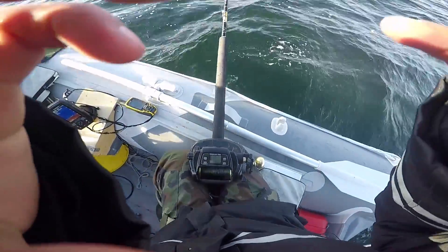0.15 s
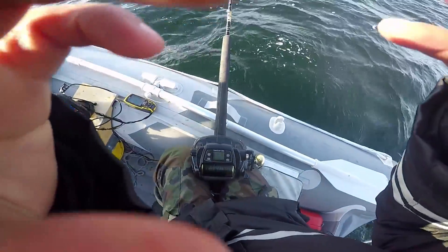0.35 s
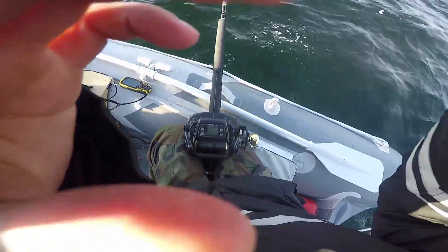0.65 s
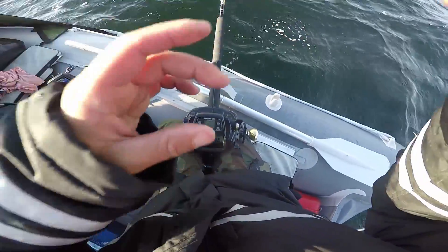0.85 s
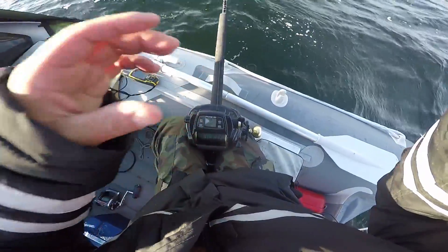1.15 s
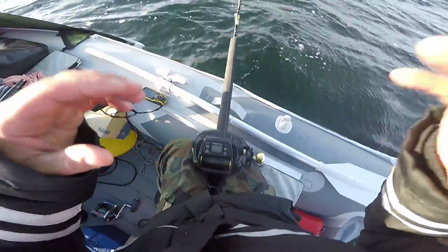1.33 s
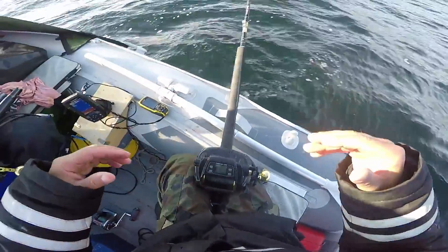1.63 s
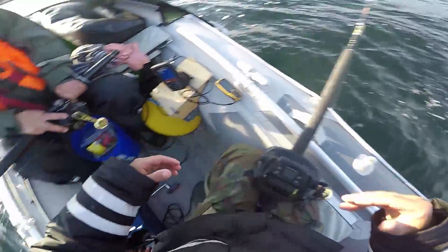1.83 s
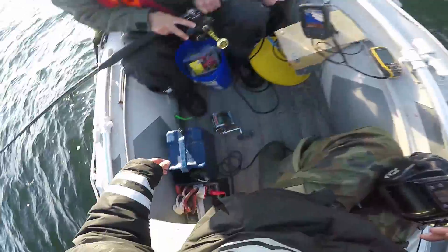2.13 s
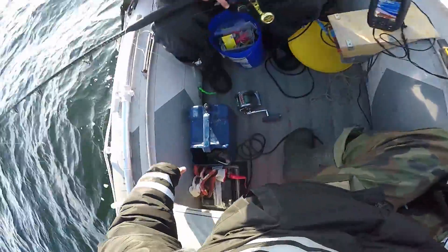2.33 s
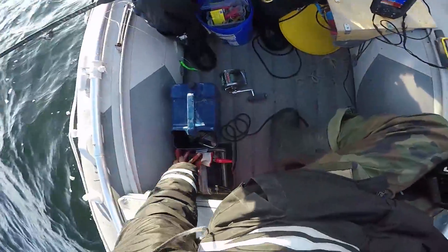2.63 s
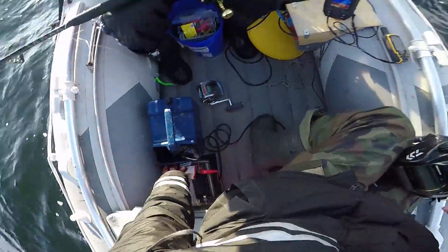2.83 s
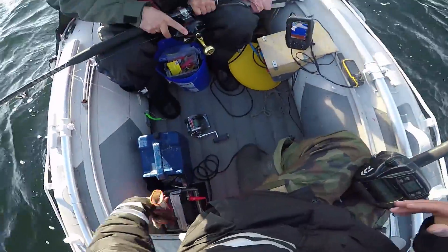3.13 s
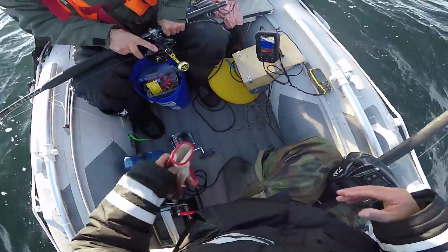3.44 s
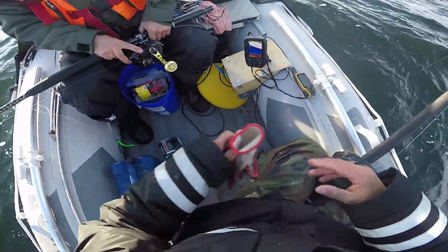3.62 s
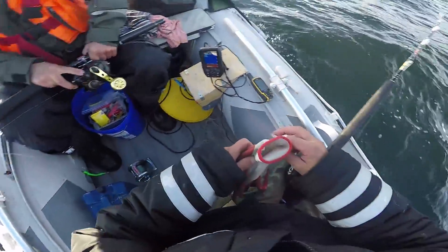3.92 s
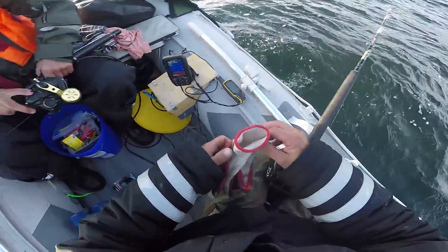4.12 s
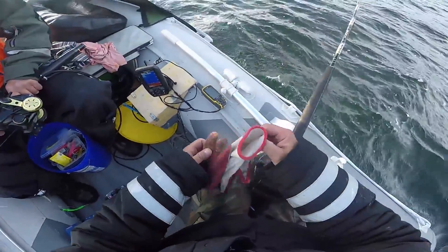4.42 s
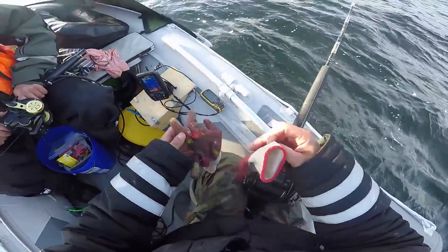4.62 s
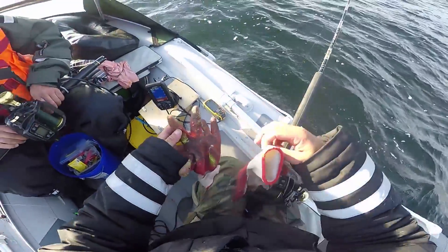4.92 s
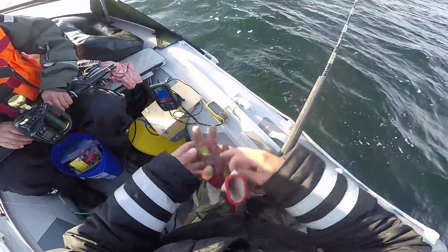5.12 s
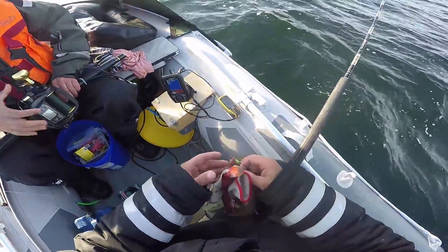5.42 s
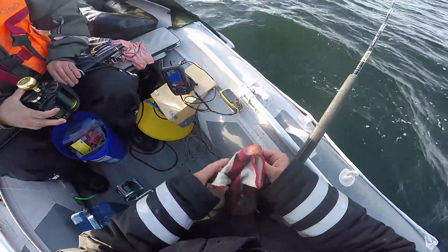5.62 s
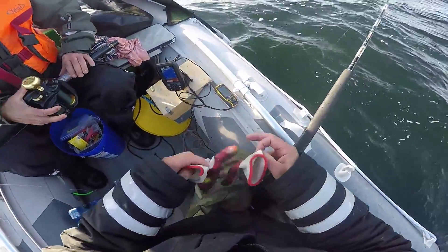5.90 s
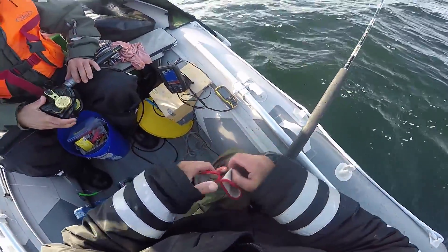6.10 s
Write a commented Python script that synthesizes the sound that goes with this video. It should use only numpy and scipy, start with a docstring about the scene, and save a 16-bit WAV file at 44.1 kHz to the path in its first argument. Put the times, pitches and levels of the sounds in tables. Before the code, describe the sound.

A close electric reel runs throughout, its dense whine around 1.1 to 1.4 kHz with strong higher gear tones, rough grinding and hissing treble. From 0 to 1 s it runs fairly fast, slightly chattering and hollowed by a nearby hand, with small knocks and wind thumps in the first half second. Pitch sags toward 1.5 s. At 1.9 s a sharp hollow knock coincides with the heaviest wind thump. The whine climbs to about 2.5 s, brighter and hissier as the head faces it, while wind drops away. It sinks by 3.3 s amid a burst of buffets, rises briefly, then sags again around 4.4 s under repeated thumps from 4 to 4.6. It surges to its highest, chattering pitch near 5.2 s, then eases down in calmer wind, with faint knocks at 5.7 and 6.2. Dry, single-microphone outdoor sound, cut off still running.

```python
"""Electric fishing reel in a small boat

An electric reel winds a fish up from depth in a small open boat, heard from the angler's head.
Gear tones and scraping noise follow one wheel, which slows as the swell loads the line.
Running light, its slack teeth chatter in bursts of tone; small hollow knocks sound about the boat.
Wind is shaped noise: a rumble, tearing gusts and short thumps on the one microphone."""
import sys
import numpy as np
from scipy import signal
from scipy.fft import rfft, irfft, next_fast_len
from scipy.io import wavfile
from scipy.ndimage import uniform_filter1d, minimum_filter1d

SR = 44100
rng = np.random.default_rng(int(sys.argv[2]) if len(sys.argv) > 2 else 0)


def dump(signal):
    """Clip the signal to [-1, 1] and save it as 16-bit WAV at the path in sys.argv[1]."""
    limited = np.clip(np.atleast_2d(signal).T, -1, 1)
    pcm = np.round(limited * 32767).astype(np.int16)
    wavfile.write(sys.argv[1], SR, pcm)


N = 276066
TIME_S = np.arange(N) / SR

# Gear wheel speed before smoothing. Each row: time in seconds, speed in turns per second.
WHEEL_SPEED_HZ = [(0.0, 41.23), (0.43, 42.61), (0.7, 42.13), (1.23, 37.72), (1.57, 36.67), (1.81, 37.48),
                  (2.47, 42.51), (2.68, 41.82), (3.02, 36.78), (3.28, 35.28), (3.87, 39.67), (4.24, 34.9),
                  (4.44, 34.48), (4.65, 36.31), (4.99, 42.77), (5.18, 44.7), (6.08, 39.47), (6.26, 39.45)]
WHEEL_LAG_S = 0.147


def wheel_turns():
    """Turns of the gear wheel so far; the spool's inertia rounds each change of speed."""
    speed_hz = uniform_filter1d(curves(WHEEL_SPEED_HZ)[0], int(WHEEL_LAG_S * SR), mode="nearest")
    return np.cumsum(speed_hz) / SR


SLOWING_SHARE = 0.68  # slowing down strains the gears less than speeding up


def motion(turns):
    """Wheel speed (Hz), acceleration (Hz/s) and surge (Hz/s): how fast the swell changes the load either way."""
    speed_hz = np.gradient(turns) * SR
    accel_hz_s = np.gradient(speed_hz) * SR
    surge_hz_s = np.maximum(accel_hz_s, -SLOWING_SHARE * accel_hz_s)
    return speed_hz, accel_hz_s, surge_hz_s


# How squarely the reel faces the microphone as the head turns. Each row: time in seconds, facing 0-1.
FACING = [(0, 0), (1.5, 0), (1.75, 0.31), (2.2, 0.92), (2.55, 1), (3.45, 0.79), (4.0, 0.32), (4.65, 0.32),
          (5.0, 0.71), (5.4, 0.51), (6.26, 0.31)]
# Strong tones: harmonics of the 31-tooth mesh and tones of the faster motor stages, in cycles per turn.
MESH_ORDERS = [31, 93, 57, 62, 124, 155, 174, 230.9]
# Their smear. Each row: once-a-turn wobble, random flutter, both as shares of the clean tone.
MESH_SMEAR = [(0, 0.08), (0.43, 0.61), (0.43, 0.38), (0.4, 0.07), (0.3, 1), (0.6, 1), (0.1, 0.6),
              (0.2, 0.7)]
# Lowest tone. Each row: time in seconds, level in dB.
LOW_TONE_DB = [(0, -45.5), (.75, -40), (1.25, -43.5), (1.75, -41), (2.0, -46), (2.25, -35), (2.5, -45.5),
               (2.75, -32), (3.0, -36), (3.25, -66), (3.5, -46), (3.85, -39.5), (4.5, -42.5), (4.75, -60),
               (5.05, -34.5), (5.5, -47), (5.8, -40.5), (6.26, -54)]
# Its third harmonic. Each row: time in seconds, level in dB.
THIRD_TONE_DB = [(0, -35), (.45, -49), (.75, -36.5), (.97, -32), (1.3, -47.5), (1.75, -30.5), (2.0, -43),
                 (2.25, -31), (2.75, -31.5), (3.25, -38.5), (3.65, -31.5), (4.0, -35.5), (4.25, -33.5),
                 (4.7, -30.5), (5.25, -44), (5.7, -30.5), (6.26, -37)]
# The other six, before the housing. Each row: level in dB at cruising speed, dB gained when facing,
# dB per Hz of extra speed, dB per Hz/s of surge.
MESH_LEVELS = [(-41.5, -0.5, -0.5, 0), (-41.5, 4, 0.3, 0.16), (-50, 10.5, 0.54, 0), (-49.5, 9.5, 0.1, 0),
               (-45.5, 8.5, -1.1, 0.54), (-47.5, -8, -1, 0.26)]
# Weaker gear tones, in cycles per turn.
SIDE_ORDERS = [19, 22, 29, 33, 44, 50.7, 63.2, 65, 88.4, 91, 114, 117, 129, 138, 162, 177, 186, 201, 209,
               217, 234, 248, 261, 279]
# Their levels before housing and beaming, same order, in dB.
SIDE_DB = [-51, -48.5, -50, -60, -52.5, -50.5, -46, -50, -51, -42.5, -46, -45, -69, -51.5, -56, -46, -45.5,
           -54, -56.5, -51, -55.5, -59.5, -64, -59]
# Radiation of the housing, for all but the two curve-driven tones. Each row: frequency in Hz, gain in dB.
HOUSING = [(500, -12.5), (1100, -3), (1600, -2), (2500, 1), (3600, -1), (4000, 2.5), (4500, -5), (4850, 0),
           (5100, -2.5), (5400, 3), (5850, -6.5), (6800, -2.5), (7300, 0), (7800, -9.5), (9000, 3),
           (10900, 2), (11600, -29)]
# Beaming of the weaker tones. Each row: frequency in Hz, dB gained when facing.
BEAMING = [(3000, 1.5), (4960, 7.5), (7050, 15.5), (8740, -0.5)]
CRUISE_HZ = 40
JITTER_TURNS, JITTER_HZ = 0.00038, 19  # play in the gears blurs the high tones


def whine(turns):
    """Gear tones locked to the wheel, shaped by housing resonances as they glide."""
    speed_hz, _, surge_hz_s = motion(turns)
    facing = curves(FACING)[0]
    extra_hz = speed_hz - CRUISE_HZ

    def housing_db(order):
        return np.interp(order * speed_hz, *np.transpose(HOUSING))

    levels_db = curves(LOW_TONE_DB) + curves(THIRD_TONE_DB)
    for order, (cruise_db, facing_db, speed_db, surge_db) in zip(MESH_ORDERS[2:], MESH_LEVELS):
        moving_db = facing_db * facing + speed_db * extra_hz + surge_db * surge_hz_s
        levels_db.append(cruise_db + housing_db(order) + moving_db)

    shaky_turns = turns + JITTER_TURNS * walk(JITTER_HZ)
    out = np.zeros(N)
    for order, db, (wobble, rough) in zip(MESH_ORDERS, levels_db, MESH_SMEAR):
        out += undb(db) * tone(shaky_turns, order, wobble, rough, patchy_db=2.04)
    for order, db in zip(SIDE_ORDERS, SIDE_DB):
        beam_db = np.interp(order * speed_hz, *np.transpose(BEAMING))
        level_db = db + housing_db(order) + (facing - facing.mean()) * beam_db
        out += undb(level_db) * tone(shaky_turns, order, wobble=0.5, rough=0.43, patchy_db=3.5)
    return out


def tone(turns, order, wobble, rough, patchy_db):
    """One gear tone: runout gives sidebands, uneven contact a skirt; its level drifts at random."""
    swing = 1 + wobble * runout(turns) + rough * flutter(96) + 0.15 * flutter(27)
    swing = swing * unit(undb(patchy_db * walk(3.66)))
    carrier = np.exp(2j * np.pi * (order * turns + rng.random()))
    return np.sqrt(2) * (swing * carrier).real


# Spectrum of the grinding teeth. Each row: frequency in Hz, relative level in dB.
GRIND_COLOUR = [(300, -8), (750, -8), (1100, -5.5), (1600, -3), (2200, -4.5), (2700, 0.5), (3100, 0),
                (3700, 3), (4200, -2.5), (4700, -12), (5600, -3)]
# Spectrum of the line hiss. Each row: frequency in Hz, relative level in dB.
HISS_COLOUR = [(3800, -71), (4700, -5), (5300, -0.5), (5900, 0.5), (6600, 8), (7200, 1), (7700, -6.5),
               (8300, -58), (9500, -29)]
# Spectrum of the sizzle. Each row: frequency in Hz, relative level in dB.
SIZZLE_COLOUR = [(7500, 2.5), (8300, 0), (9000, 6.5), (10000, -1.5), (10900, 4), (11600, -13), (12500, -11)]
# Spectrum of the highest treble. Each row: frequency in Hz, relative level in dB.
AIR_COLOUR = [(11000, 3.5), (11800, -5.5), (12800, -1), (13700, -5), (15200, -13)]
# Highest treble. Each row: time in seconds, level in dB.
AIR_DB = [(0, -41.5), (1.0, -45), (1.7, -43.5), (2.5, -39), (3.3, -43.5), (3.9, -49.5), (6.26, -50)]
# Rows grind, hiss, sizzle. Each row: level in dB, dB gained when facing, dB per Hz/s of surge.
RUB_LEVELS = [(-29, 0.9, 0.0729), (-41, 14, -0.07), (-46, -8, 0.63)]
# Tooth impacts. Each row: centre in cycles per turn, half width in Hz, level in dB against the grind gain.
IMPACT_BANDS = [(40.72, 120, -23.5), (63.94, 243, -12.5), (93.7, 350, -17.5), (170.5, 460, -39)]


def rubbing(turns):
    """Tooth impacts and friction through the housing; line hisses onto the spool and sizzles under a surge."""
    facing, surge_hz_s = curves(FACING)[0], motion(turns)[2]
    grind_gain, hiss_gain, sizzle_gain = (undb(db + facing_db * facing + surge_db * surge_hz_s)
                                          for db, facing_db, surge_db in RUB_LEVELS)
    impacts = np.zeros(N)
    for order, half_width_hz, db in IMPACT_BANDS:
        band = flutter(half_width_hz) * np.exp(2j * np.pi * order * turns)
        impacts += undb(db) * unit(band.real)
    friction = undb(-4.0) * colour(scrape(turns, 0.19, 1.9), GRIND_COLOUR)
    hiss = colour(scrape(turns, 0.071, 1.9), HISS_COLOUR)
    sizzle = colour(scrape(turns, 0.09, 0.38), SIZZLE_COLOUR)
    air = colour(scrape(turns, 0.12, 0.6), AIR_COLOUR)
    return (grind_gain * (friction + impacts) + hiss_gain * hiss
            + sizzle_gain * sizzle + undb(curves(AIR_DB)[0]) * air)


def scrape(turns, repeat_share, throb_db, size=1024):
    """Noise of sliding teeth: part repeats every turn, and it swells where the wheel runs tight."""
    surface = signal.resample(rng.standard_normal(size), 8 * size)
    repeating = unit(surface[(turns % 1 * len(surface)).astype(int)])
    fresh = rng.standard_normal(N)
    noise = np.sqrt(repeat_share) * repeating + np.sqrt(1 - repeat_share) * fresh
    return noise * undb(throb_db * unit(runout(turns).real))


SLACK_HZ, CHATTER_LEAD_S = 42.6, 0.086  # full chatter above this speed; lead of load on speed
CHATTER_DB, CHATTER_DB_PER_HZ, CHATTER_FACING_DB = -35, 4.5, -2.5  # full level, loss below SLACK_HZ, facing


def chatter(turns, burst_s=0.0095):
    """Slack teeth bounce in short uneven bursts just above the mesh pitch and its harmonics."""
    bursts_per_turn, timing_scatter, size_db = 1.8, 0.3, 2.8
    chance = rng.standard_normal((int(turns[-1] * bursts_per_turn), 2))
    burst_turns = (np.arange(len(chance)) + timing_scatter * chance[:, 0]) / bursts_per_turn
    when = np.searchsorted(turns, burst_turns).clip(0, N - 1)
    out = np.zeros(N)
    for harmonic, db in enumerate([0, -2, -9], 1):
        kicks = np.zeros(N, complex)
        kicks[when] = undb(size_db * chance[:, 1]) * np.exp(2j * np.pi * rng.random(len(when)))
        bursts = signal.fftconvolve(kicks, np.hanning(int(burst_s * SR)))[:N]
        order = MESH_ORDERS[0] * harmonic + 1.6
        out += undb(db) * unit((bursts * np.exp(2j * np.pi * order * turns)).real)
    speed_hz, accel_hz_s, _ = motion(turns)
    heading_hz = speed_hz + CHATTER_LEAD_S * accel_hz_s
    slack_db = CHATTER_DB_PER_HZ * np.minimum(heading_hz - SLACK_HZ, 0)
    return out * undb(CHATTER_DB + slack_db + CHATTER_FACING_DB * curves(FACING)[0])


# Hand cupped near the microphone. Each row: time in seconds, closeness 0-1.
HAND_CLOSENESS = [(0, 0.65), (.7, 0.62), (.9, 0.43), (1.1, 0.22), (6.26, 0)]
# Bands its reflection reinforces. Each row: centre in Hz, width in Hz, lift in dB at closeness 1.
HAND_LIFTS = [(2040, 870, 9), (4700, 410, 10), (10070, 410, 2.5), (12500, 620, 5)]
# Bands its reflection cancels. Each row: centre in Hz, width in Hz.
HAND_NOTCHES = [(3250, 2270), (11000, 5300)]


def behind_hand(x):
    """The near hand's reflection takes two bands out of the reel's sound and lifts others."""
    closeness = curves(HAND_CLOSENESS)[0]

    def band(x, hz, width_hz):
        return signal.lfilter(*signal.iirpeak(hz, hz / width_hz, fs=SR), x)

    for hz, width_hz, db in HAND_LIFTS:
        x = x + closeness * (undb(db) - 1) * band(x, hz, width_hz)
    for hz, width_hz in HAND_NOTCHES:
        x = x - closeness * band(x, hz, width_hz)
    return x


# Small hollow knocks about the boat. Each row: time of the peak in seconds, pitch in Hz, level in dB.
KNOCKS = [(0.086, 620, -26), (0.206, 950, -30), (0.346, 920, -32), (.385, 1080, -25), (1.915, 1061, -11),
          (5.699, 600, -26), (6.19, 980, -26)]


def knocks(length_s=0.0031, width_hz=110):
    """Soft knocks, each a brief swell of one broad resonance."""
    out = np.zeros(N)
    for s, hz, db in KNOCKS:
        envelope = np.exp(-((TIME_S - s) / length_s) ** 2)
        resonance = unit((flutter(width_hz) * np.exp(2j * np.pi * hz * TIME_S)).real)
        out += undb(db) * envelope * resonance
    return out


# Wind thumps at set times, strong and weak. Each row: time of the peak in seconds, level in dB before
# the common gain, length in seconds before the rise and fall factors, corner in Hz.
BUFFETS = [(.195, -21, 0.019, 153), (.293, -28, 0.0088, 230), (.38, -12.5, 0.012, 240),
           (.455, -19.5, 0.025, 150), (.524, -18, 0.047, 132), (.653, -23, 0.0079, 256),
           (.78, -24.5, 0.047, 140), (1.226, -14.5, 0.016, 112), (1.295, -18.5, 0.02, 159.9),
           (1.535, -16.5, 0.041, 156), (1.734, -25, 0.041, 235), (1.917, -6.5, 0.02, 254.4),
           (2.012, -17, 0.0097, 207), (2.164, -26, 0.019, 110), (2.286, -24, 0.02, 139.6),
           (3.049, -19.5, 0.019, 139), (3.157, -13.5, 0.016, 223.4), (3.19, -8.5, 0.016, 263.6),
           (3.225, -18, 0.0093, 170), (3.266, -17, 0.033, 266.7), (3.325, -16, 0.033, 230),
           (3.549, -15.5, 0.029, 169.4), (3.75, -23.5, 0.072, 219.6), (3.969, -11.5, 0.023, 260),
           (4.065, -12.5, 0.011, 111.8), (4.138, -11, 0.032, 129.2), (4.185, -10, 0.0087, 175),
           (4.313, -16, 0.0096, 367.7), (4.413, -15.5, 0.026, 108.3), (4.448, -15.5, 0.016, 265),
           (4.536, -11.5, 0.023, 188), (4.616, -15, 0.011, 150), (5.99, -21, .021, 230),
           (6.184, -22.5, 0.044, 257)]
BUFFET_GAIN_DB = 1.5


def buffets(size=8192, slope=2.28, rise=0.61, fall=0.69, low_hz=60):
    """Eddies hit the microphone as short noise thumps; a higher corner reaches further up the spectrum."""
    out = np.zeros(N + 2 * size)
    t = (np.arange(size) - size // 2) / SR
    hz = np.fft.rfftfreq(size, 1 / SR)
    for s, db, length_s, corner_hz in list(BUFFETS) + eddies():
        gain = hz / (hz + low_hz) / np.sqrt(1 + (hz / corner_hz) ** (2 * slope))
        gain = gain / (1 + (hz / 1500) ** 4)
        swirl = irfft(gain * np.exp(2j * np.pi * rng.random(len(hz))))
        side_s = np.where(t < 0, rise, fall) * length_s
        shape = 1 / np.cosh(np.clip(t / side_s, -20, 20)) ** 2
        thump = swirl * shape
        thump = thump * np.sqrt(np.sum(shape ** 2) / np.sum(thump ** 2))
        start = int(s * SR) + size // 2
        out[start:start + size] += undb(db + BUFFET_GAIN_DB) * thump
    return out[size:size + N]


# Rising and falling level of the wind rumble. Each row: time in seconds, level in dB.
WIND_DB = [(0, -20), (.45, -20.5), (.88, -27.5), (1.1, -21), (1.6, -20.5), (2.0, -23.5), (2.35, -28),
           (2.55, -38), (3.05, -29), (3.28, -19.5), (3.55, -28), (3.78, -23), (4.3, -29.5), (4.55, -20.5),
           (4.75, -31), (5.2, -23), (5.8, -31.5), (6.26, -23)]
EDDIES_PER_S, EDDY_LENGTH_S, EDDY_CORNER_HZ = 8, 0.012, 236
EDDY_DB, EDDY_SCATTER_DB, EDDY_SCATTER_OCTAVES = -6, 2, 0.43  # level is against the wind


def eddies():
    """More eddies at uneven random intervals, following the wind's level, as rows like those of BUFFETS."""
    chance = rng.standard_normal((int(EDDIES_PER_S * N / SR), 3))
    when_s = (np.arange(len(chance)) + 0.5 + 0.5 * chance[:, 0]) / EDDIES_PER_S
    when_s = when_s.clip(0, TIME_S[-1])
    levels_db = np.interp(when_s, *np.transpose(WIND_DB)) + EDDY_DB + EDDY_SCATTER_DB * chance[:, 1]
    corners_hz = EDDY_CORNER_HZ * 2 ** (EDDY_SCATTER_OCTAVES * chance[:, 2])
    return [(s, db, EDDY_LENGTH_S, hz) for s, db, hz in zip(when_s, levels_db, corners_hz)]


# Spectrum of the rumble. Each row: frequency in Hz, relative level in dB.
WIND_COLOUR = [(12, -2), (25, 0.5), (50, -1.5), (90, -1), (140, -5), (250, -11.5), (400, -19), (700, -36.5),
               (1500, -57)]


def wind(tear_db=-38.5, tear_growth=3.4, tear_ref_db=-21.5):
    """Turbulent rumble on the microphone, never even; strong gusts tear higher up."""
    gust_db = curves(WIND_DB)[0]
    swell = unit(undb(3.54 * walk(15.3)))
    rumble = undb(gust_db) * colour(rng.standard_normal(N), WIND_COLOUR)
    tear_noise = colour(rng.standard_normal(N), [(250, -7), (450, 6.5), (800, -10.0), (1400, -3)])
    tear = undb(tear_db + tear_growth * (gust_db - tear_ref_db)) * tear_noise
    return swell * (rumble + tear)


def runout(turns, reach=2.7, count=8):
    """Swings that come back on every turn of a slightly uneven wheel."""
    k = np.r_[-count:0, 1:count + 1]
    angle = np.linspace(0, 1, 256)
    weights = np.exp(-np.abs(k) / reach + 2j * np.pi * rng.random(len(k)))
    one_turn = unit(np.exp(2j * np.pi * np.outer(angle, k)) @ weights)
    return np.interp(turns % 1, angle, one_turn)


def flutter(width_hz):
    """Random complex swings of size and phase, up to about width_hz fast; rms 1."""
    noise = rng.standard_normal(N) + 1j * rng.standard_normal(N)
    return unit(signal.sosfilt(signal.butter(2, width_hz, fs=SR, output="sos"), noise))


def walk(rate_hz):
    """Real random drift up to about rate_hz fast; rms 1."""
    return unit(flutter(rate_hz).real)


def colour(x, points):
    """Filter by a spectrum of (Hz, dB) points, falling steeply outside them; rms 1."""
    hz, db = np.transpose(points)
    size = next_fast_len(N)
    log_f = np.log(np.fft.rfftfreq(size, 1 / SR) + 1)
    outside = np.abs(log_f - np.clip(log_f, np.log(hz[0]), np.log(hz[-1])))
    gain = undb(np.interp(log_f, np.log(hz), db) - 30 * outside)
    return unit(irfft(rfft(x, size) * gain, size)[:N])


def curves(table):
    """Columns after the time column, interpolated to every sample."""
    s, *columns = np.transpose(table)
    return [np.interp(TIME_S, s, c) for c in columns]


def undb(db):
    """Decibels to gain."""
    return 10 ** (np.asarray(db) / 20)


def unit(x):
    """Scale to rms 1."""
    return x / np.sqrt(np.mean(np.abs(x) ** 2))


def scene():
    """Reel, knocks and wind, the same in both ears."""
    turns = wheel_turns()
    reel = behind_hand(whine(turns) + rubbing(turns) + chatter(turns))
    mono = reel + knocks() + buffets() + wind()
    return np.array([mono, mono])


def peak_hold(x, release_s):
    """Follows each peak at once and lets go exponentially."""
    fall = TIME_S / release_s
    return np.exp(np.maximum.accumulate(np.log(np.abs(x) + 1e-9) + fall) - fall)


TOP_HZ = 15200


def record(dry, ceiling=0.74, release_s=0.076):
    """A limiter ducks everything under the hardest peaks; a steep low-pass cuts the top."""
    gain = np.minimum(1, ceiling / peak_hold(dry[0], release_s))
    gain = uniform_filter1d(minimum_filter1d(gain, size=129), size=129)
    low_pass = signal.ellip(14, 0.1, 80, TOP_HZ, fs=SR, output="sos")
    return signal.sosfilt(low_pass, dry * gain)


dry = scene()
out = record(dry)
dump(out)
```